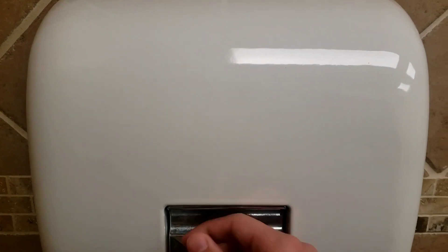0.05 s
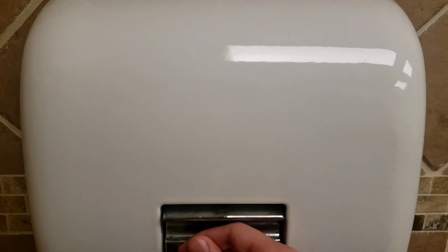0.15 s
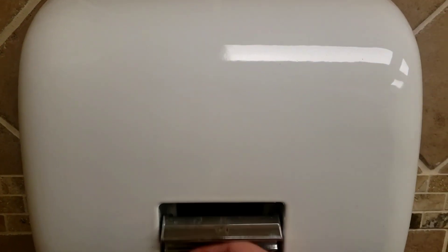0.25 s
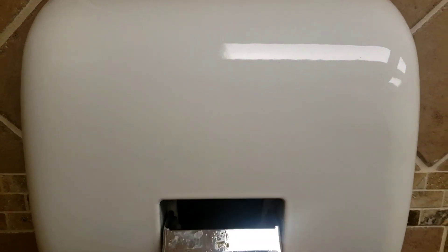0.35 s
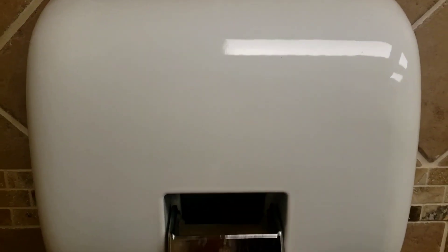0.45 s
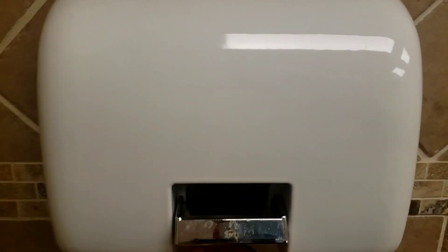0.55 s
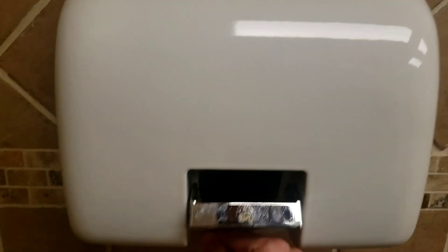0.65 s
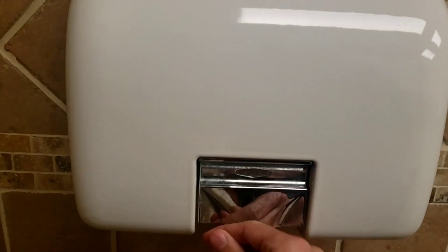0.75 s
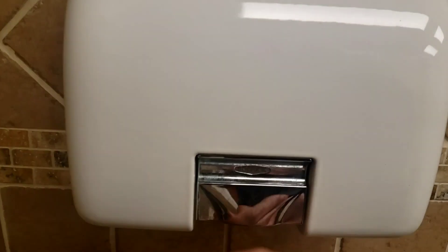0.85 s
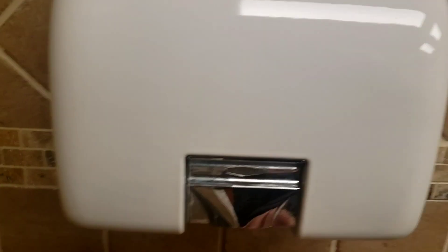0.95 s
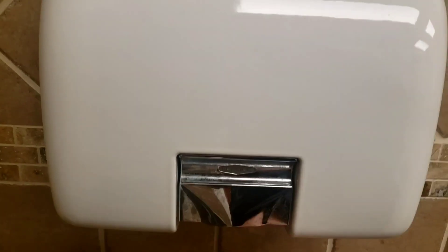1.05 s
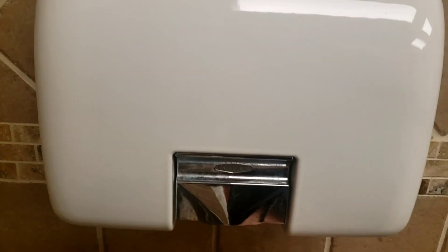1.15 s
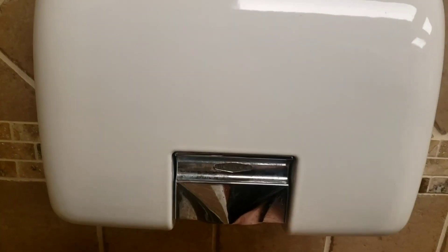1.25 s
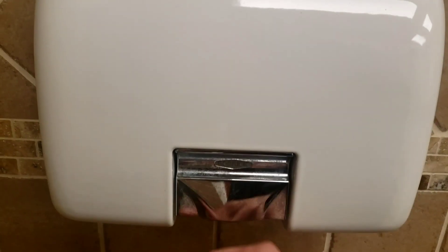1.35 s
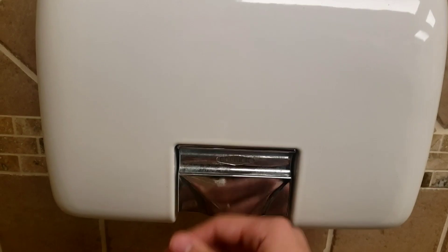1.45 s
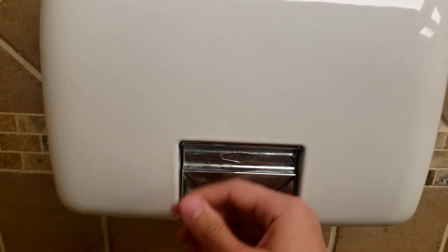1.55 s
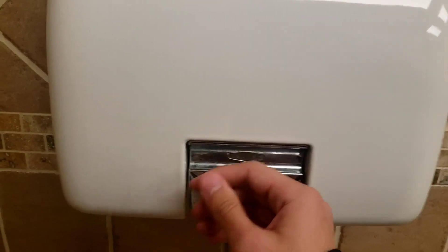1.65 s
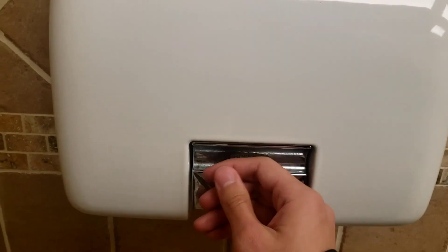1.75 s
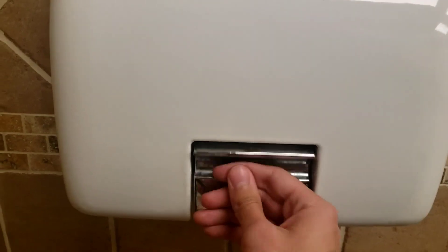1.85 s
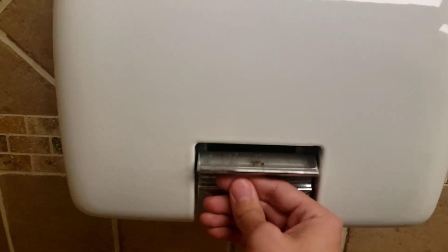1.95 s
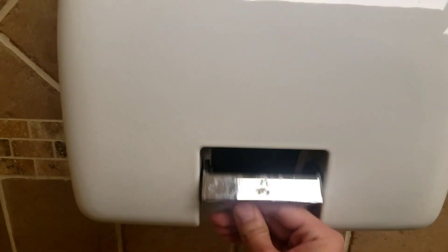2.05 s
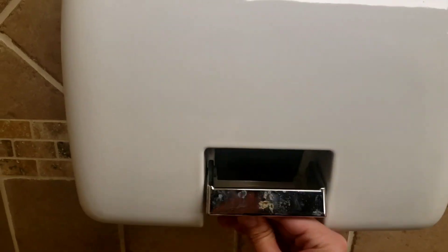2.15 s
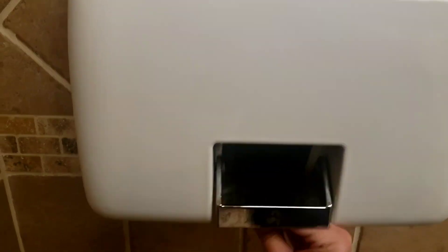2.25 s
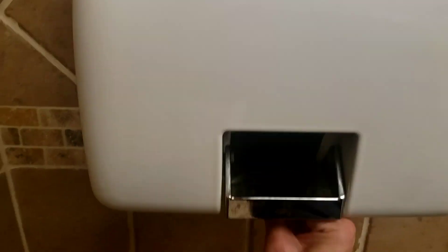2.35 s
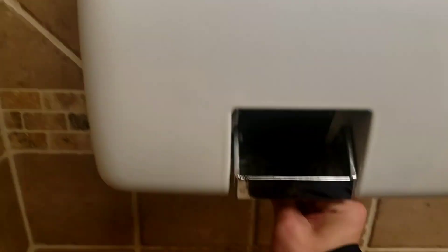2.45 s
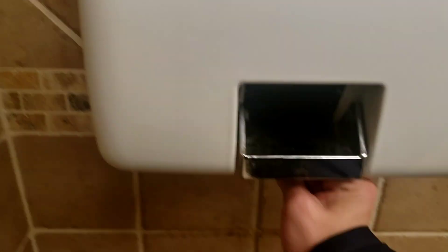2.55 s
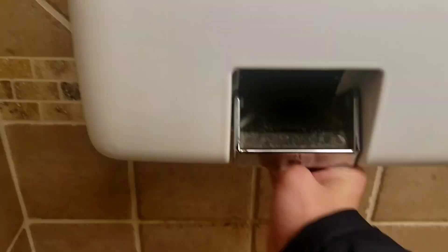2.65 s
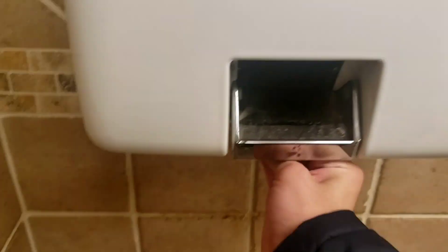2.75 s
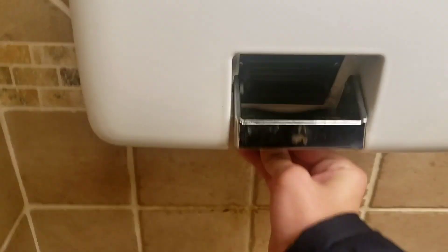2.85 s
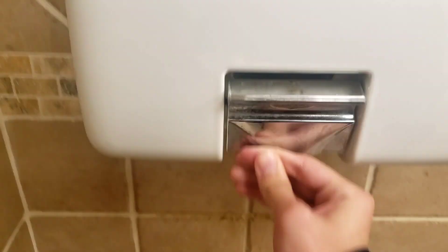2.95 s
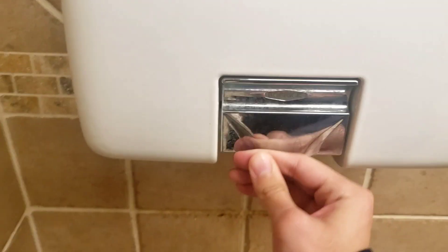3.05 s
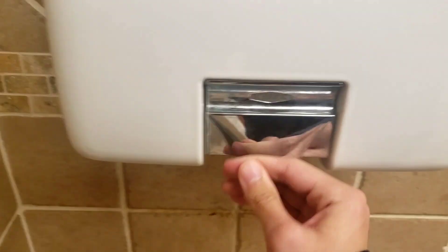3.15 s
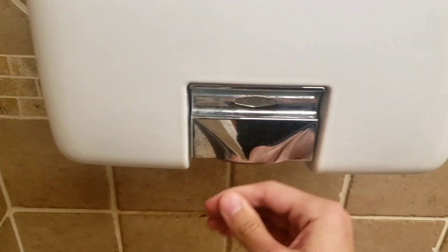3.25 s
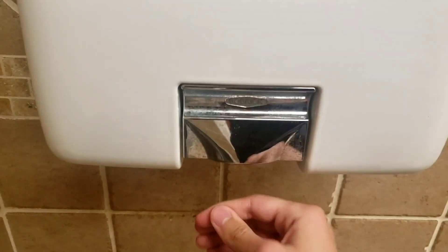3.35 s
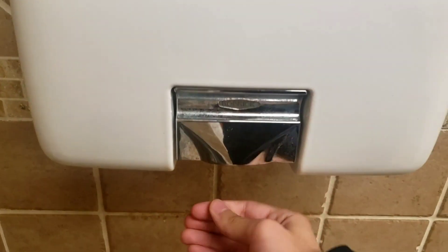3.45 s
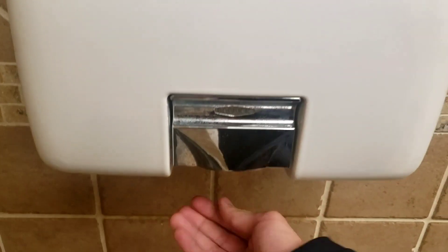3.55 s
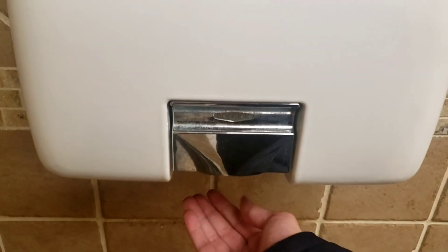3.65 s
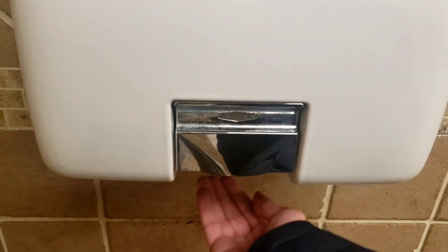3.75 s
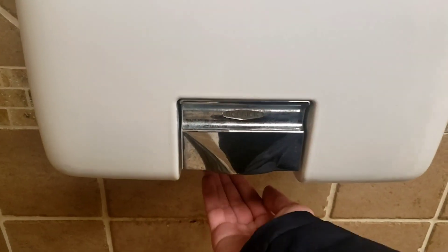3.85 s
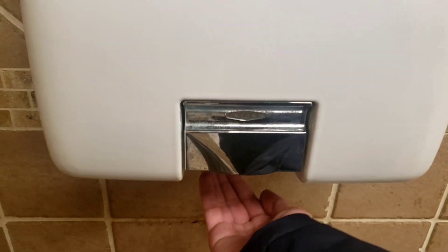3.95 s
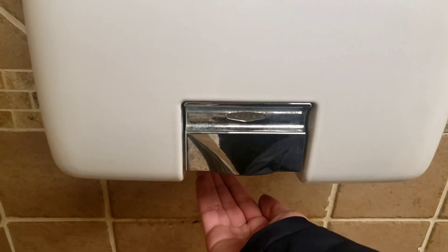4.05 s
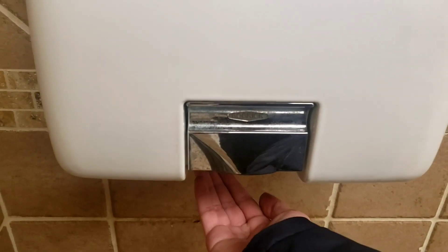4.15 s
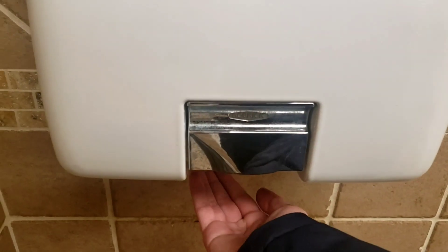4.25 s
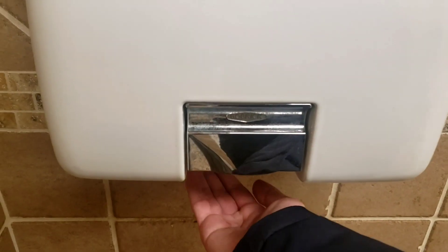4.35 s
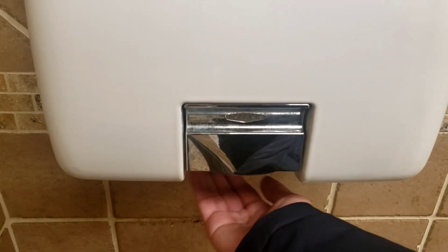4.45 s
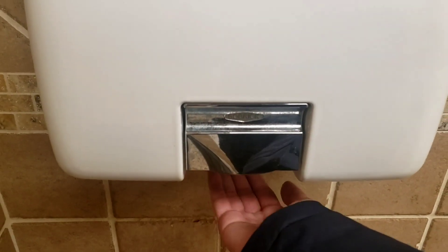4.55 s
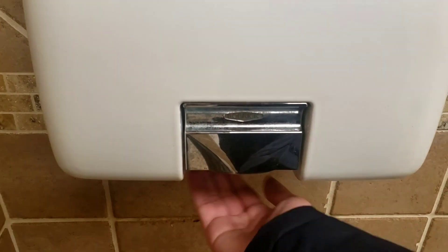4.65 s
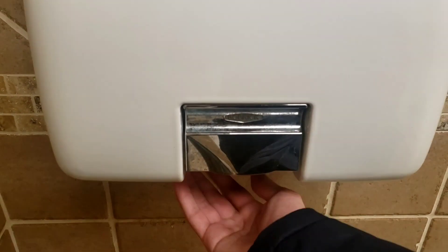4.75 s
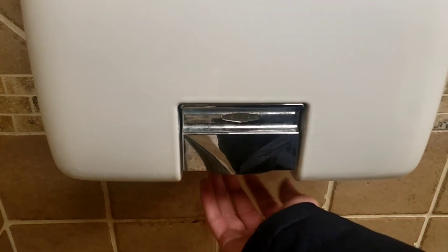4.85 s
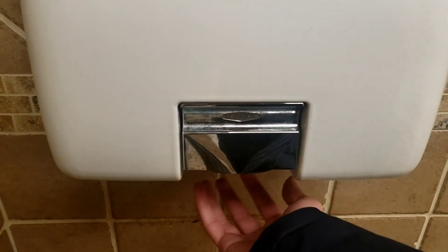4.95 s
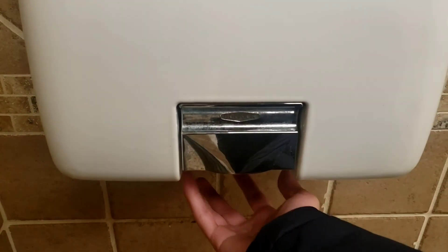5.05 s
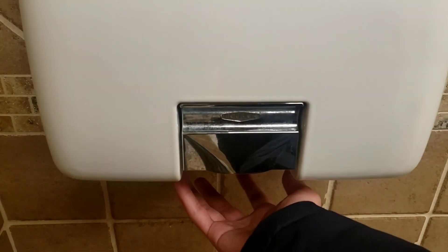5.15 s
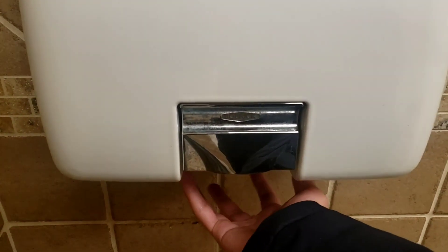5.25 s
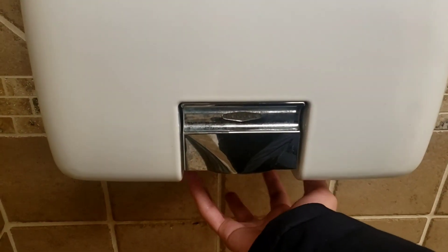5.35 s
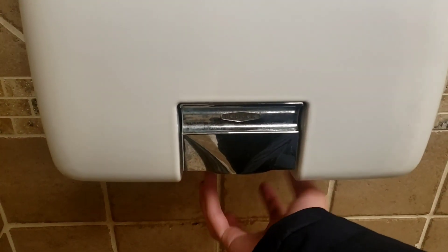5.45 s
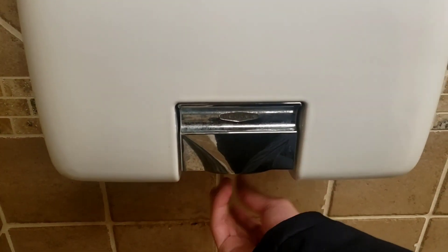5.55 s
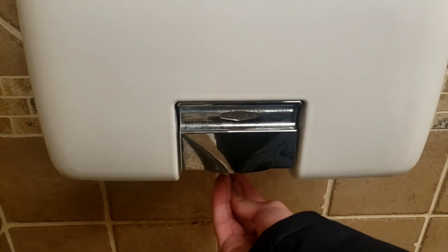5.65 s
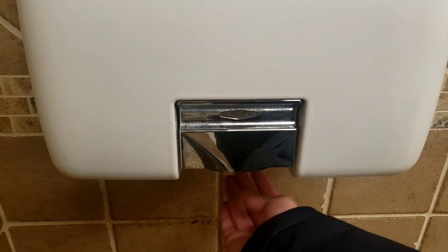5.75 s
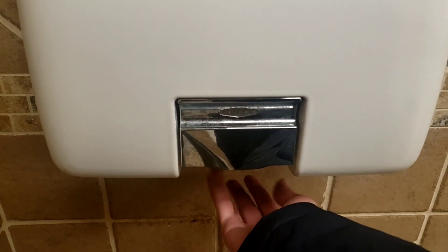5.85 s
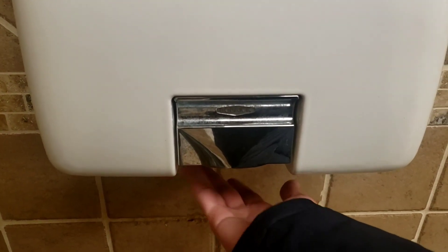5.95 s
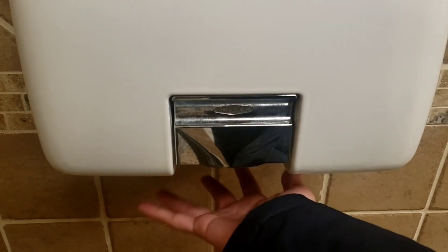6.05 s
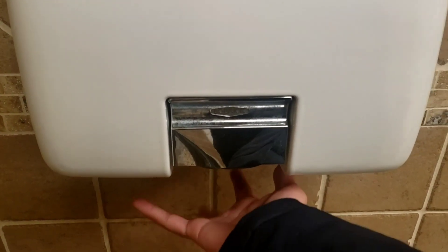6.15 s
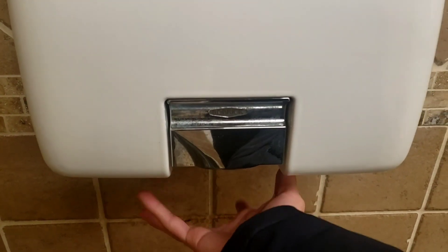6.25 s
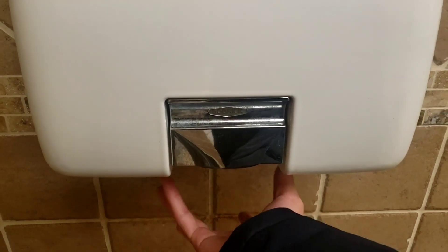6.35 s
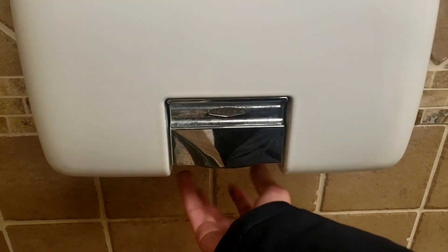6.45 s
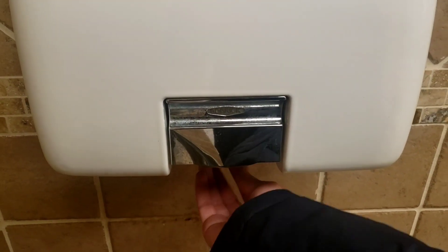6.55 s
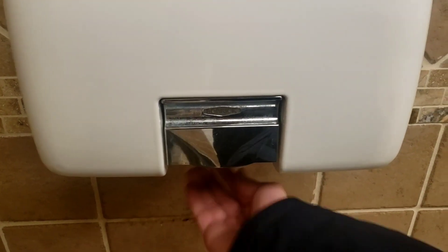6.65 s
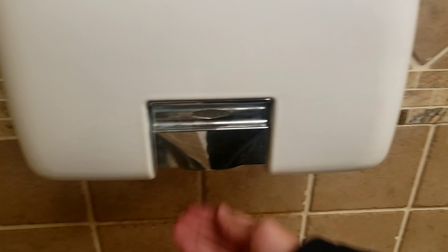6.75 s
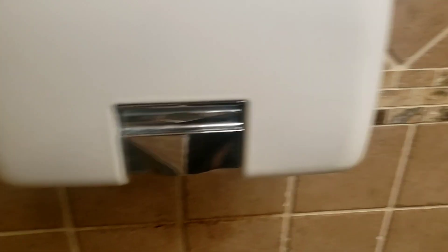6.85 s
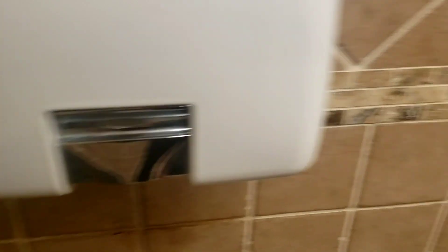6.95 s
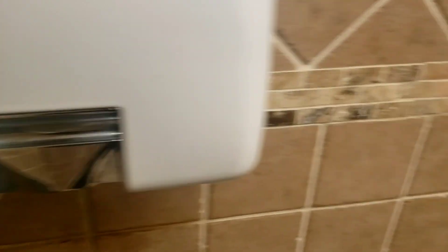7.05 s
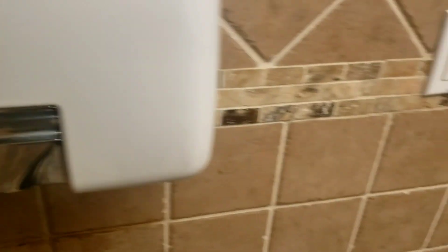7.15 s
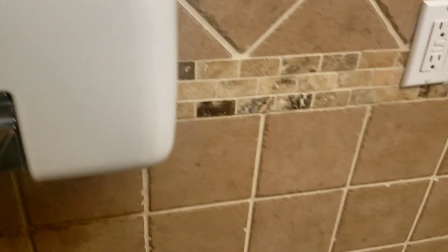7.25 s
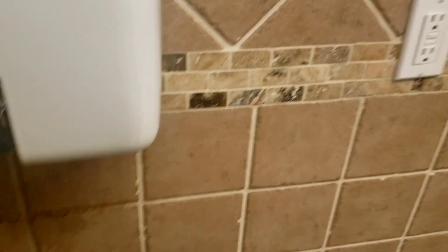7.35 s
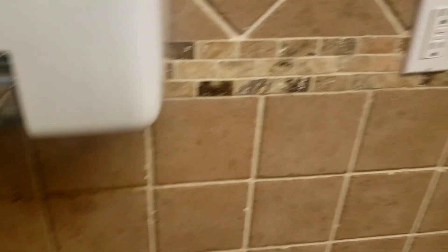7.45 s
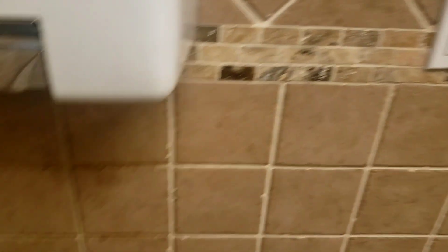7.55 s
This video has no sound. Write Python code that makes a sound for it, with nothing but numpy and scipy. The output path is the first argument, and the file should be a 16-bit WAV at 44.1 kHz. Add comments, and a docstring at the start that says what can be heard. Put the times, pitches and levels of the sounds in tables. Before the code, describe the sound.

A hand rubs and flips a hinged metal nozzle with squeak and sharp clacks, then a hand dryer clicks on and roars steadily.

```python
"""A small tiled restroom: a wall-mounted hand dryer, heard close by on two microphone ports.
A hand rubs and flips the hinged metal nozzle: noise strokes, a stick-slip squeak, and clacks that ring damped modes.
Then a relay closes, the motor growls and hums as the blower runs up, and a start switch snaps on the way.
Its air roars on as banded noise through the resonances of the housing; the knocks echo off the tiles."""
import sys
import numpy as np
from scipy import signal
from scipy.io import wavfile

SR = 44100
rng = np.random.default_rng(int(sys.argv[2]) if len(sys.argv) > 2 else 0)


def wrap_up_sound(samples):
    """Save the sound to the file named by the first command line argument, as 16-bit audio."""
    columns = np.atleast_2d(samples).T
    # keep every value between -1 and 1, then stretch to whole-number steps
    tamed = np.clip(columns, -1, 1)
    steps = np.round(tamed * 32767).astype(np.int16)
    wavfile.write(sys.argv[1], SR, steps)


N = 335601

# resonances of housing and room, full for the blower: [f/Hz, width/Hz, boost/dB]
HOUSING_MODES = [(91.7, 5.8, 9.5), (117.5, 2.9, 7.5), (149.3, 3.6, 6), (170.3, 7.6, 10.5),
                 (230.7, 17.3, 6.5), (309, 23, 2), (358.7, 16, 10), (441, 6.2, 6.5), (560, 11, 2),
                 (477.3, 16, 9.5), (619, 14, 6), (669, 12, 5), (769.5, 18, 7), (989, 33, 7), (1140, 23, 5),
                 (1317, 24, 6), (1469, 20, 7.5), (1600, 48, 3), (1820, 170, -4), (2098, 31, 8.5),
                 (2346, 17, 4.5), (2660, 130, 2.5), (3960, 140, 4.5), (4930, 30, -6), (7350, 660, 3),
                 (9670, 3500, -5.5)]
# balance of the two microphone ports: [f/Hz, left above right/dB]
PORT_BALANCE = [(60, 4.5), (110, -0.5), (200, 1), (380, -1.5), (700, -2.5), (1290, 7), (2380, 3.5),
                (4400, 4.5), (8120, 8.5), (15000, 10.5)]
LEFT_RIGHT = np.array([[.5], [-.5]])   # halves a level difference between the ports
MOTOR_ON_S = 2.655
HANDLED_S = 3.5   # nozzle ringing and stroke levels are worked out up to here


def from_db(db):
    """Decibels to gain."""
    return 10 ** (np.asarray(db) / 20)


def rms_one(x):
    """Scale to rms 1."""
    return x / np.sqrt(np.mean(x ** 2) + 1e-20)


def in_time(rows):
    """Columns of a curve table, one value a sample."""
    s, *columns = np.transpose(rows)
    return [np.interp(np.arange(N) / SR, s, column) for column in columns]


def at_hz(points, hz):
    """Read a spectrum on a log-frequency axis."""
    table_hz, values = np.array(points).T
    return np.interp(np.log(hz), np.log(table_hz), values)


def drift(rate):
    """Smooth random wander of spread 1, faster for a higher rate; drawn at every 40th sample."""
    r = np.exp(-80 * np.pi * rate / SR)
    white = rng.standard_normal(N // 40 + 2002)
    slow = signal.lfilter([1], [1, -2 * r, r * r], white)[2000:]   # drop the settling of the filter
    return np.interp(np.arange(N) / 40, np.arange(len(slow)), rms_one(slow))


def butter(x, order, hz, kind):
    """Butterworth filter."""
    return signal.sosfilt(signal.butter(order, hz, kind, fs=SR, output="sos"), x)


def ring(x, hz, t60):
    """A damped mode: a unit click sets a sine of height 1 ringing."""
    r, w = from_db(-60 / (t60 * SR)), 2 * np.pi * hz / SR
    return signal.lfilter([0, np.sin(w)], [1, -2 * r * np.cos(w), r * r], x + 1e-18)


def resonance(x, hz, width_hz):
    """Band-pass of gain 1 on top."""
    r = np.exp(-np.pi * width_hz / SR)
    poles = [1, -2 * r * np.cos(2 * np.pi * hz / SR), r * r]
    return (1 - r * r) / 2 * signal.lfilter([1, 0, -1], poles, x)


def boost(x, hz, width_hz, db):
    """Lift or cut a narrow band."""
    return x + (from_db(db) - 1) * resonance(x, hz, width_hz)


def bands(length):
    """Third-octave bands of stereo noise as the two ports hear them, with their centres."""
    # likeness of the two ports: [f/Hz, likeness 0-1]
    port_likeness = [(30, .8), (100, .98), (250, .98), (500, .82), (900, .88), (1300, .7), (2000, .4),
                     (4000, .2), (8000, .05)]
    # phase by which the left port leads the right: [f/Hz, lead/rad]
    phase_lead = [(220, 0.05), (400, 0.82), (600, 0.77), (900, 1.3), (1400, 0.92), (1900, -1.7), (2700, .8)]
    edges = 22 * 2 ** np.arange(0, 9.6, 1 / 3)
    white = rng.standard_normal((2, 2, length))      # neighbouring bands get unrelated noise
    for k, (low, high) in enumerate(zip(edges, edges[1:])):
        mid, side = butter(white[k % 2], 2, [low, high], "band")
        hz = np.sqrt(low * high)
        alike = np.clip(at_hz(port_likeness, hz), 0, 1)
        pair = np.sqrt(1 + alike) * mid + np.sqrt(1 - alike) * side * [[1], [-1]]
        lag = round(at_hz(phase_lead, hz) / (2 * np.pi * hz) * SR)
        pair[1] = np.roll(pair[1], lag)   # a positive lead makes the right port later
        yield hz, pair * from_db(at_hz(PORT_BALANCE, hz) * LEFT_RIGHT)


def layered_noise(spectrum, layers_db, start, length, trim_db, shared_db, patchy_db):
    """Noise whose four layers, from bass to treble, each follow their own level."""
    # where each of the four layers rules: [f/Hz]
    layer_centres = [95, 260, 1100, 2600]
    out, together = np.zeros((2, N)), drift(3.9)
    span = slice(start, start + length)
    for hz, pair in bands(len(together[span])):
        shares = [np.interp(np.log(hz), np.log(layer_centres), one) for one in np.eye(len(layer_centres))]
        level_db = sum(share * db for share, db in zip(shares, layers_db))
        flicker_db = shared_db * together + patchy_db * drift(13.0)
        gain = from_db(trim_db + at_hz(spectrum, hz) + level_db + flicker_db)
        out[:, span] += gain[span] * pair
    return out


def blower():
    """Turbulent air noise grows as a power of run-up progress and excites the housing resonances."""
    # colour of the air noise ahead of layer levels and trim: [f/Hz, relative density/dB]
    air_colour = [(15, -63), (25, -30.5), (80, -13.5), (193, -8), (233, 0), (356, -3.5), (531, -13.5),
                  (903, -12), (977, -12), (1500, -18.5), (1900, -25.5), (2110, -22), (3150, -26),
                  (7360, -26.5), (14300, -25.5)]
    # closeness of the hand to the nozzle: [t/s, closeness 0-1]
    hand_closeness = [(3.5, 1), (3.7, 1), (4.4, 0.83), (5.0, 0.7), (6.3, 0.77), (6.9, 0.6), (7.2, 0.66)]
    # layers rumble, roar, throat, jet hiss once levelled off, ahead of the trim: [level/dB]
    full_db = [-33, -22.5, -25.5, -19.5]
    # amplitude of each layer grows as run-up progress to this power: [exponent]
    growth_powers = [1.22, 1.46, 1.08, 0.95]
    # run-up progress at which each layer stops growing: [multiples of run_up_s]
    full_at = [1.74, 0.81, 1.43, 1.09]
    # lift of each layer with a hand right under the nozzle: [level/dB]
    hand_in_jet_db = [16, 0.1, 5.73, 0.39]
    # loss of each layer once the microphone turns aside: [level/dB]
    turned_away_db = [-5, -0.5, -3.5, -0.5]
    before_catch_db = [0, 0, -7, -5]   # the brighter layers come in with a step
    catch_s, turn_s, turn_length_s = 2.755, 6.9, 0.15
    run_up_s, knee = 0.84, 50   # progress rises evenly; a high knee levels the noise off sharply

    t = np.arange(N) / SR
    progress = np.clip((t - MOTOR_ON_S) / run_up_s, 1e-3, None)
    hand = in_time(hand_closeness)[0]
    turned = np.clip((t - turn_s) / turn_length_s, 0, 1)
    before = np.clip((catch_s - t) / .015, 0, 1)
    lurch_db = 2.5 * np.exp(-progress / 0.5)   # the start is uneven
    layers_db = []
    for db, power, full, hand_db, away_db, before_db in zip(
            full_db, growth_powers, full_at, hand_in_jet_db, turned_away_db, before_catch_db):
        part = progress / full
        grown_db = 20 * np.log10(part / (1 + part ** knee) ** (1 / knee))
        steady_db = db + power * grown_db + lurch_db * drift(3.0)
        layers_db.append(steady_db + hand_db * hand + away_db * turned + before_db * before)
    air = layered_noise(air_colour, layers_db, round(MOTOR_ON_S * SR), N,
                        trim_db=15.5, shared_db=-0.05, patchy_db=0.78)
    for hz, width_hz, db in HOUSING_MODES:
        air = boost(air, hz, width_hz, db)
    return air


def motor_hum():
    """The motor windings hum near two, three and four times the mains rate, each tone wavering."""
    # hum tones: [f/Hz, rms level before the waver/dB]
    hum_tones = [(119.5, -44), (179.5, -45), (239, -49)]
    t = np.arange(N) / SR
    hum = sum(from_db(db + 2.1 * drift(12.0)) * np.sqrt(2) * np.sin(2 * np.pi * hz * t)
              for hz, db in hum_tones)
    return hum * np.clip((t - MOTOR_ON_S) / 0.034, 0, 1)


def growl():
    """Magnetic buzz and rattle of the starting motor; it dies away as the rotor gathers speed."""
    # buzz as multiples of the mains rate: [multiple, relative level before the waver/dB]
    buzz_orders = [(5, -8), (6, -4), (7, 0), (8, -1), (9, -3), (10, -8)]
    mains_hz, level_db, first_db = 60.2, -38.5, -11   # faint at first, before it catches
    delay_s, attack_s, length_s = 0.019, 0.01, 0.32   # it catches a moment after the relay
    t = np.arange(N) / SR
    since = np.maximum(t - MOTOR_ON_S - delay_s, 0)
    buzz = sum(from_db(db + 3.7 * drift(13.0)) * np.sin(2 * np.pi * (k * mains_hz * t + rng.random()))
               for k, db in buzz_orders)
    laminations = butter(rng.standard_normal(N), 3, [333, 628], "band")
    rough = rms_one(buzz) + rms_one(laminations)
    first = from_db(first_db) * np.clip((t - MOTOR_ON_S) / .008, 0, 1)
    shape = np.maximum(first, np.minimum(since / attack_s, 1)) * np.exp(-(since / length_s) ** 4)
    lurch_db = 1.5 * drift(8.0)
    return from_db(level_db + lurch_db) * shape * rms_one(rough)


def start_switch():
    """A snap and a short rattle inside the motor during the run-up: decaying bands of noise."""
    # snap, then two parts of the rattle: [from f/Hz, to f/Hz, level/dB, decay/s]
    snap_parts = [(2800, 5600, -32, .008), (1850, 2150, -35, .035), (2400, 2900, -35, .03)]
    opens_s = 3.224
    since, white = np.arange(N) / SR - opens_s, rng.standard_normal(N)
    out = np.zeros(N)
    for low, high, db, decay_s in snap_parts:
        noise = rms_one(butter(white, 2, [low, high], "band"))
        out += from_db(db) * noise * np.exp(-np.maximum(since, 0) / decay_s)
    return (since > 0) * out


def contacts():
    """Metal contacts: a crack and a short chatter, with the drives they give nozzle, lip and housing."""
    # contacts of nozzle and relay; levels in dB set the parts against each other:
    # [t/s, level/dB, chatter/s, treble/dB, top/dB, ring/dB, thump/dB,
    #  nozzle tipped out in the hand 0-1, singing/dB]
    contact_rows = [(0.521, -39, 0.022, 7, 7.5, -25, -10, 1, -34),
                    (0.539, -39.5, .014, -13, 0, -20, 2, 1, -43),
                    (0.661, -51, 0.027, -22, -2, -10, 9, 1, -17),
                    (0.871, -6.5, 0.016, 0, -9, -29, -48, 0, -80),
                    (0.883, -7.5, 0.013, -1.5, -12, -24, -21, 0, -42),
                    (0.894, -12, 0.02, -1.5, -11, -26.5, -29, 0, -79),
                    (1.488, -49, 0.022, -1.5, -6, -33, 4, 0, -50),
                    (2.219, -41.5, 0.013, 5.5, 8, -28.5, -26, 1, -49),
                    (2.359, -25.5, 0.013, 3, 7, -22.5, -22.5, 1, -48),
                    (2.37, -28.5, 0.012, -1.5, -3, -18.5, -18, 1, -60),
                    (2.423, -34, 0.0099, -19, 3, -18, -1, 1, -45),
                    (2.431, -33, 0.0072, -16, 0, -16, -7, 1, -60),
                    (2.448, -38, 0.017, -21, 2, -10.5, -3.5, 1, -36),
                    (2.658, -47, 0.029, -0.5, 0, -36, -1, 0, -60)]
    dull_left_db, bright_left_db = 11.5, 16    # left above right for the dull and the bright part
    still_singing_db = -70.5     # the lip still sings from an earlier flip
    strike_db, chatter_ring_db = 17, -2   # first touch and chatter, as they drive the modes
    chatter, thumps = np.zeros((2, N)), np.zeros(N)
    to_ring, to_lip = np.zeros((2, N)), np.zeros((2, N))   # rows: nozzle shut, tipped out
    to_lip[1, 0] = from_db(still_singing_db)

    t = np.arange(round(.3 * SR)) / SR
    grains = rng.standard_normal((len(contact_rows), len(t)))
    dull = butter(grains, 2, 3500.0, "low")
    tops = butter(grains, 2, 8500.0, "high")
    click = 1. * (t == 0)
    soft = butter(click, 2, 1800.0, "low")
    for row, grain, low, top in zip(contact_rows, grains, dull, tops):
        s, db, chatter_s, treble_db, top_db, ring_db, thump_db, tipped, singing_db = row
        at, held = round(s * SR), int(tipped > .5)
        span = slice(at, at + len(t))
        shape = 0.5 * np.exp(-(t / max(chatter_s, .001)) ** 2) + 0.57 * np.exp(-t / 0.0015)
        envelope = from_db(db - 7.5) * shape
        bright = grain - low + (from_db(top_db) - 1) * top
        bright = envelope * from_db(treble_db) * bright
        low = envelope * low
        chatter[:, span] += low * from_db(dull_left_db * LEFT_RIGHT)
        chatter[:, span] += bright * from_db(bright_left_db * LEFT_RIGHT)
        strike = from_db(db + strike_db) * (soft + from_db(treble_db) * (click - soft))
        # the chatter strikes the modes afresh
        to_ring[held, span] += from_db(ring_db) * (strike + from_db(chatter_ring_db) * (low + bright))
        thumps[span] += from_db(db + thump_db) * np.exp(-(t / 0.023) ** 2) * grain
        to_lip[held, at] += from_db(db + singing_db)
    chatter = butter(chatter, 2, 750.0, "high")
    chatter = boost(chatter, 8800, 2500, -7.5)   # a broad dip in the treble
    return chatter, to_ring, to_lip, thumps


def nozzle_ringing(to_ring):
    """Damped modes of nozzle and cover; fingers holding the tipped nozzle shorten their ringing."""
    # modes: [f/Hz, relative level shut/dB, relative level tipped out/dB, t60 shut/s]
    nozzle_modes = [(463, 1, -3, 0.069), (520, -4, -2, .12), (805, -14, -4.5, .12), (896, -6, -1.5, .15),
                    (1010, 9.5, 1.5, 0.075), (1117, -0.5, 0, .13), (1305, 4, 0.5, .07),
                    (1890, 4.5, -12.5, .06), (2057, 0.5, 1, .12), (2220, 0.5, -6.5, 0.071),
                    (2337, 7.5, -2, 0.11), (2820, -7, 3, 0.17), (2933, -5, 2.5, 0.12),
                    (3500, -5.5, 9.5, .05), (4230, -2.5, 0, .05), (5230, 2.5, -1.5, .05),
                    (5730, 3, -2.5, 0.082), (6360, 1, 3, 0.06), (11640, 0.5, 10, 0.028),
                    (12600, -1, 6.5, .025)]
    held_damping = .65   # share of the ring time left when held
    rattle_db = 4   # the loose nozzle rattles, which roughens the ringing of each mode
    end = round(HANDLED_S * SR)
    shut, out = to_ring[:, :end]
    modes = np.zeros((2, end))
    for hz, shut_db, out_db, t60 in nozzle_modes:
        gain = from_db(at_hz(PORT_BALANCE, hz) * LEFT_RIGHT - 15.5 + rattle_db * drift(80.0)[:end])
        ringing = from_db(shut_db) * ring(shut, hz, t60)
        ringing = ringing + from_db(out_db) * ring(out, hz, held_damping * t60)
        modes += gain * ringing
    return np.pad(modes, [(0, 0), (0, N - end)])


def lip_singing(to_lip):
    """Lightly damped modes of cover and thin lip sing on; tipped out, the lip sings alone and lower."""
    # cover and lip with the nozzle shut; a close pair beats: [f/Hz, relative level/dB, t60/s]
    shut_modes = [(339, 19.5, 0.45), (352, 12, .3), (459, 13, .15), (1385, -1, .5), (1703, 1, .7),
                  (4735, -7, 0.8), (8130, 11, .2), (1724, -8, 1.7), (1727.6, -15, 2.0)]
    # lip with the nozzle tipped out: [f/Hz, relative level/dB, t60/s]
    out_modes = [(1640, -3, 1.5), (1672, 0, 1.0)]
    lip = sum(from_db(db) * ring(hits, hz, t60)
              for hits, modes in zip(to_lip, [shut_modes, out_modes]) for hz, db, t60 in modes)
    return lip * from_db(2.5 * drift(30))   # the loose hinge makes the singing waver


def housing_thump(thumps):
    """Low noise bursts from the contacts excite a resonance of the housing."""
    thumps = butter(thumps, 2, [90.0, 680.0], "band")
    return 3 * boost(thumps, 159, 9.1, 13.0)


def squeak():
    """Stick-slip in the hinge: a short harmonic tone that throbs."""
    # glide of the squeak: [t/s, f/Hz, level before the throb/dB]
    hinge_glide = [(.778, 987, -58), (.79, 1010, -46), (0.797, 990, -43.5), (.803, 940, -35.5),
                   (.812, 917, -37), (0.826, 935, -40), (.836, 931, -41.5), (.849, 945, -52),
                   (.86, 956, -44.5), (.868, 983, -47.5)]
    # overtones: [multiple, relative level/dB]
    overtone_orders = [(2, -14), (3, -14), (4, -23)]
    overtones_from_s = .797   # they set in as the slip roughens
    t = np.arange(N) / SR
    hz, db = in_time(hinge_glide)
    overtones_db = 1 + .4 * (db - db.max())   # they also rise with the level
    phase = 2 * np.pi * np.cumsum(hz * (1 + .022 * drift(150))) / SR   # uneven slips blur the pitch
    gate = np.clip(np.minimum(t - hinge_glide[0][0], hinge_glide[-1][0] - t) / .004, 0, 1)
    overtones = sum(from_db(order_db + 3.1 * drift(80.0)) * np.sin(k * phase)
                    for k, order_db in overtone_orders)
    overtones = overtones * from_db(overtones_db) * np.clip((t - overtones_from_s) / 0.0043, 0, 1)
    tone = from_db(3.0 * drift(110.0) + 0.5) * np.sin(phase) + overtones
    return np.sqrt(2) * gate * from_db(db) * tone


def chirps():
    """Fingertips slip on the chrome: short faint puffs of noise in one narrow resonance each."""
    # slips of the fingertips: [t/s, length/s, f/Hz, level/dB]
    finger_slips = [(0.288, .012, 5740, -64), (0.338, 0.026, 2070, -63), (0.408, 0.022, 2720, -66.5),
                    (0.624, 0.022, 2756, -63.5), (0.667, 0.014, 2980, -62.5), (2.148, .02, 2040, -70)]
    t, white = np.arange(N) / SR, rng.standard_normal(N)
    return sum(from_db(db) * np.exp(-((t - s) / length_s) ** 2) * rms_one(resonance(white, hz, 110.0))
               for s, length_s, hz, db in finger_slips)


def stroke_levels():
    """Each stroke sets in quickly, fades as the hand slows and dies away; powers add over room air."""
    # strokes of the hand over the nozzle, ahead of fade and trim:
    # [t/s, length/s, low rumble level/dB, rumble level/dB, rustle level/dB]
    hand_strokes = [(0.0, 0.14, -54, -56, -44.5), (0.118, 0.17, -55, -31, -47),
                    (0.25, 0.49, -47, -40, -42.5), (0.508, 0.26, -49, -32, -41.5),
                    (0.765, 0.17, -52, -42, -32.5), (0.897, 0.14, -42.5, -45, -57.5),
                    (1.334, 0.19, -74, -78.5, -59), (1.462, 0.11, -48, -49, -52.5),
                    (1.888, 0.18, -67, -52, -51.5), (2.105, 0.13, -72, -49.5, -48.5),
                    (2.213, 0.2, -73, -53, -45.5), (2.374, 0.19, -52, -31.5, -54)]
    # what stays of each noise layer when the hand rests, ahead of the trim: [level/dB]
    resting_db = [-68, -59.5, -83, -75]
    # dying away of each layer: [decay/s]
    release_times = [.05, 0.027, 0.031, .045]
    attack_s, fade_db_per_s = 0.043, 17
    t = np.arange(round(HANDLED_S * SR)) / SR
    powers = [from_db(2 * db) for db in resting_db]
    for s, length_s, low_db, rumble_db, rustle_db in hand_strokes:
        scuff_db = -2.5 + 0.21 * rumble_db + (1 - 0.21) * rustle_db   # a blend of rumble and rustle
        since = np.maximum(t - s, 0)
        held = np.minimum(since / attack_s, 1) * from_db(-fade_db_per_s * since)
        after = np.maximum(since - length_s, 0)
        powers = [power + (from_db(db) * held * np.exp(-after / release_s)) ** 2 for power, db, release_s
                  in zip(powers, [low_db, rumble_db, scuff_db, rustle_db], release_times)]
    return [np.pad(10 * np.log10(power), (0, N - len(t)), "edge") for power in powers]


def handling():
    """Lumpy noise of the rubbing hand over room air, tinged by the housing, in the first 3 s."""
    # colour of the rubbing ahead of stroke levels and trim: [f/Hz, relative density/dB]
    rub_colour = [(15, -40.5), (25, -11), (71, 8.5), (176, -1), (257, -16.5), (515, -13.5), (637, -26.5),
                  (1000, -22), (1390, -35), (2070, -30.5), (15000, -34)]
    scrape_depths_db = [1.5, 2, 1.5, 1]   # for each layer
    catch = drift(30)   # the rubbing catches and slips
    levels_db = [db + depth_db * catch for db, depth_db in zip(stroke_levels(), scrape_depths_db)]
    rub = layered_noise(rub_colour, levels_db, 0, 3 * SR, trim_db=16.0, shared_db=0.0, patchy_db=2.5)
    for hz, width_hz, db in HOUSING_MODES:
        rub = boost(rub, hz, width_hz, 0.4 * db)
    return rub


def room_hum():
    """Wavering hum of the room: noise through very narrow resonances."""
    # hum of the room: [f/Hz, rms level/dB]
    hum_bands = [(59.2, -59), (118.4, -61.5)]
    return sum(from_db(db) * rms_one(resonance(rng.standard_normal(N), hz, 3.5)) for hz, db in hum_bands)


def restroom(x):
    """Diffuse tail off the tiles: each band of noise dies at its own rate, over a slower faint tail."""
    # reverberation of the tiles: [f/Hz, t60/s]
    tile_decay = [(100, 0.46), (340, 0.14), (1000, 0.32), (4000, 0.32), (11000, 0.21)]
    late_db, late_t60_s = -21.5, 0.61   # from the far corners
    t = np.arange(round(.7 * SR)) / SR
    tail = np.zeros((2, len(t)))
    for hz, pair in bands(len(t)):
        early = from_db(-60 * t / at_hz(tile_decay, hz))
        late = from_db(late_db - 60 * t / late_t60_s)
        tail += pair * (early + late)
    tail = tail * np.clip(t / 0.0034, 0, 1) / np.sqrt(np.sum(tail ** 2) / 2)
    return signal.fftconvolve(x[None], tail, axes=1)[:, :N]


def scene():
    """Blower and motor, the nozzle sounds with their room tail, the hand and the room hum."""
    chatter, to_ring, to_lip, thumps = contacts()
    ringing = nozzle_ringing(to_ring)
    knocks = chatter + lip_singing(to_lip) + housing_thump(thumps)
    knocks = knocks + squeak() + chirps() + start_switch()
    # the ringing faces the microphone; less of it reaches the tiles
    to_room = (knocks + from_db(-6) * ringing).mean(axis=0)
    dryer = blower() + motor_hum() + growl()
    nozzle = knocks + ringing + from_db(-2) * restroom(to_room)
    return dryer + nozzle + handling() + room_hum()


def record(dry):
    """The loudest peaks are rounded and the top is cut steeply."""
    rounded = np.tanh(dry)
    return signal.sosfilt(signal.ellip(14, .5, 90, 14540, fs=SR, output="sos"), rounded)


dry = scene()
out = record(dry)
wrap_up_sound(out)
```